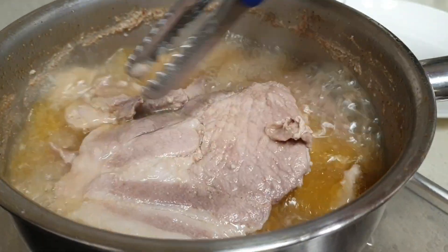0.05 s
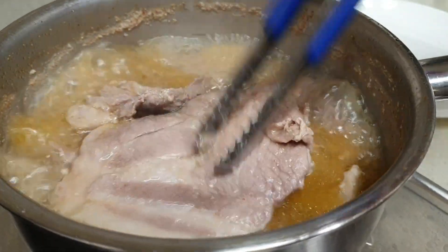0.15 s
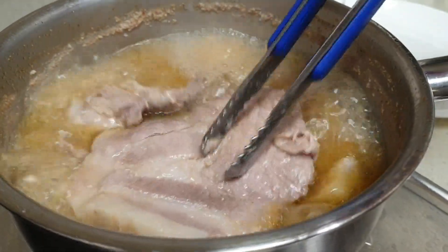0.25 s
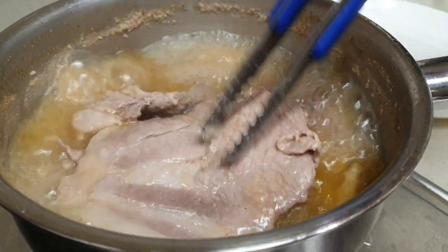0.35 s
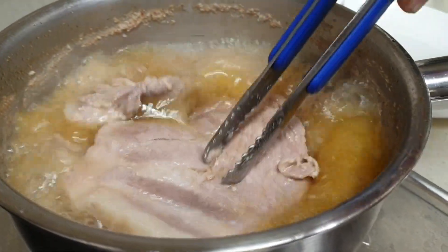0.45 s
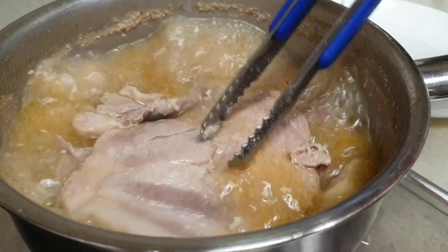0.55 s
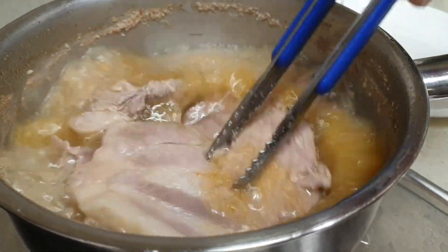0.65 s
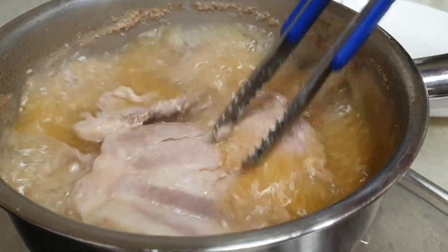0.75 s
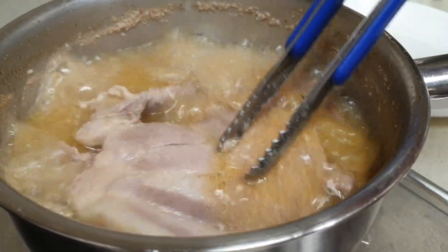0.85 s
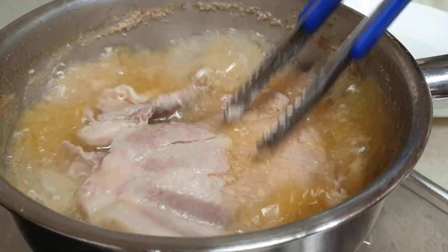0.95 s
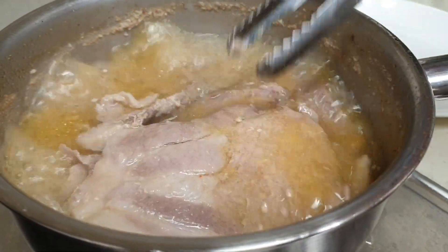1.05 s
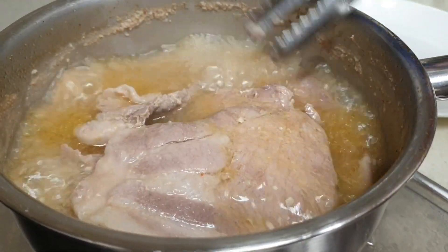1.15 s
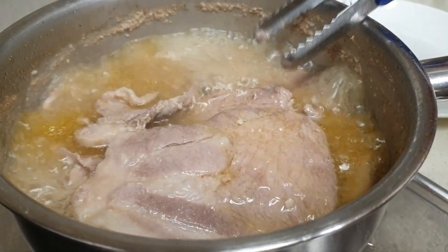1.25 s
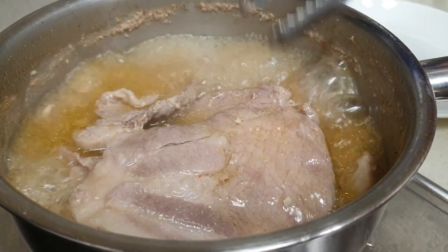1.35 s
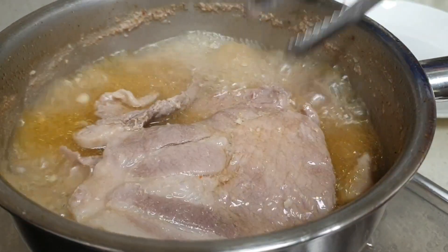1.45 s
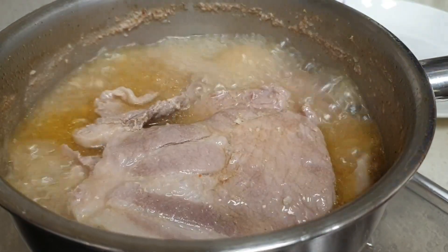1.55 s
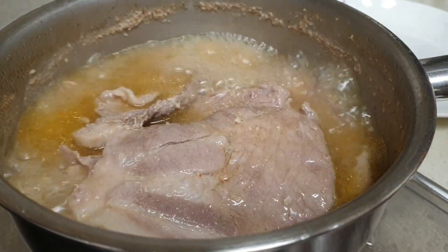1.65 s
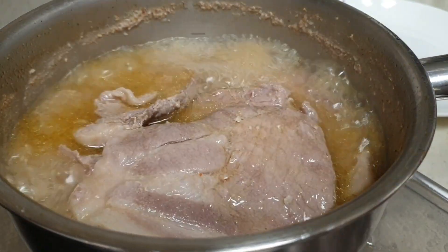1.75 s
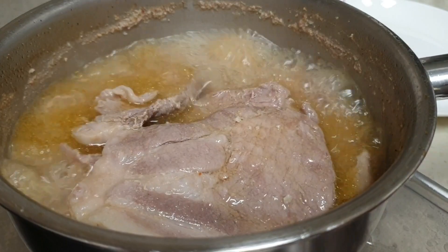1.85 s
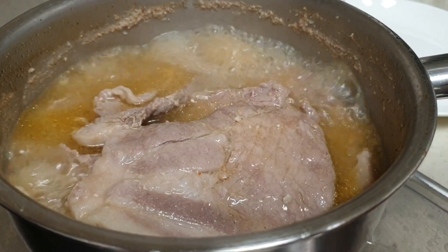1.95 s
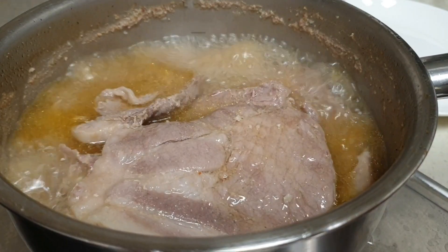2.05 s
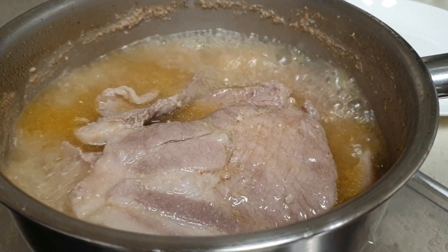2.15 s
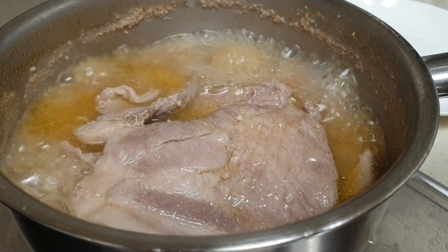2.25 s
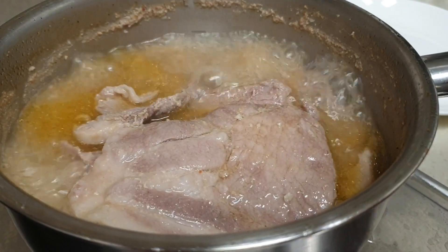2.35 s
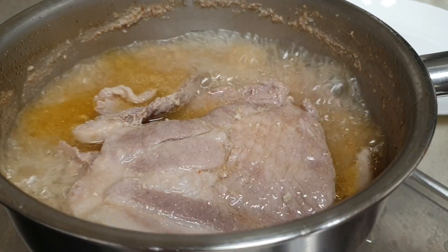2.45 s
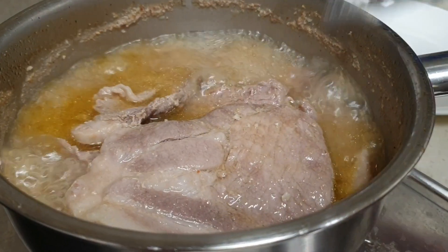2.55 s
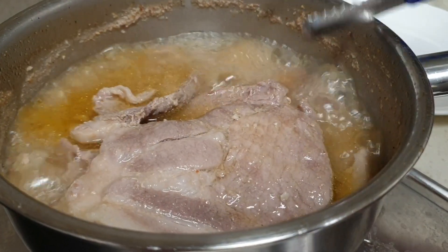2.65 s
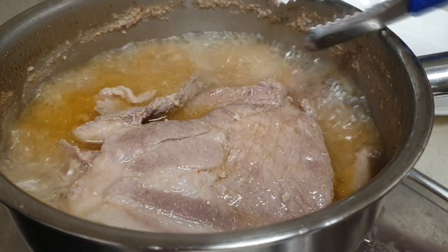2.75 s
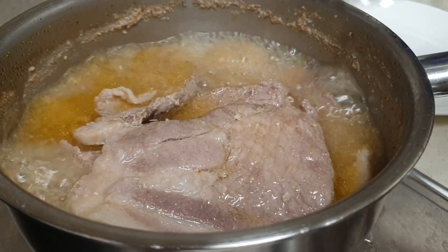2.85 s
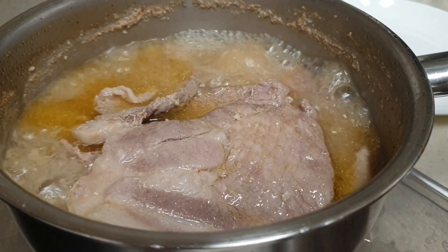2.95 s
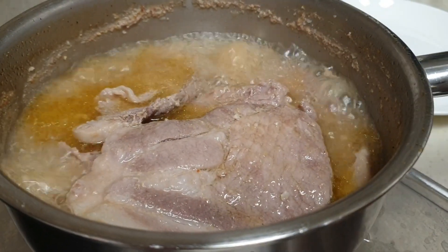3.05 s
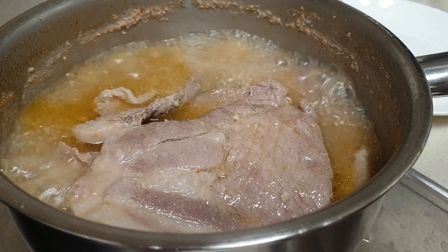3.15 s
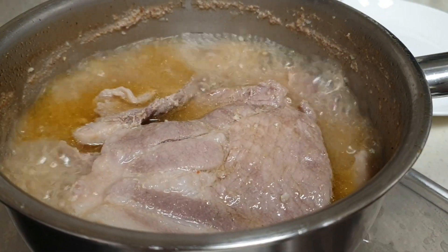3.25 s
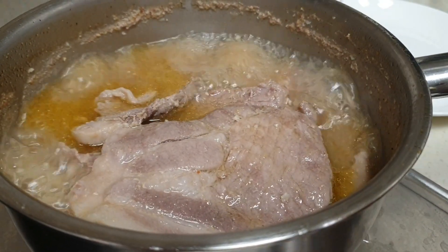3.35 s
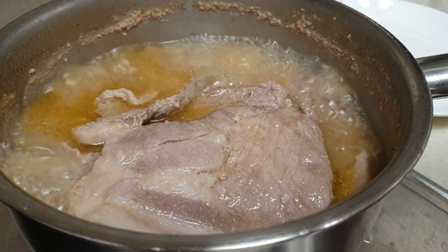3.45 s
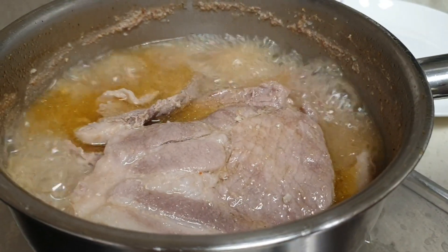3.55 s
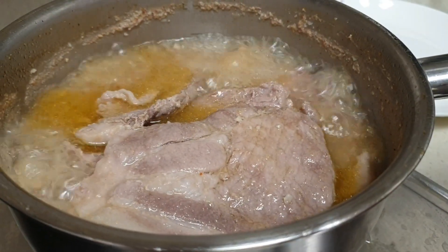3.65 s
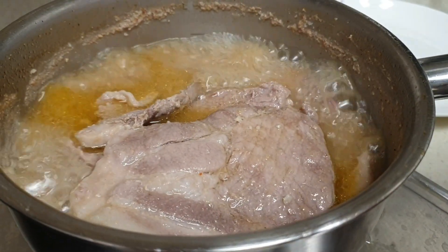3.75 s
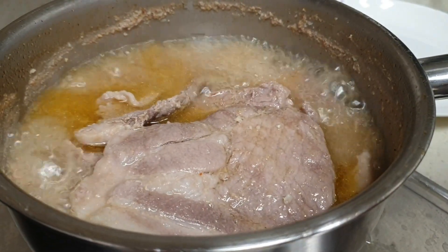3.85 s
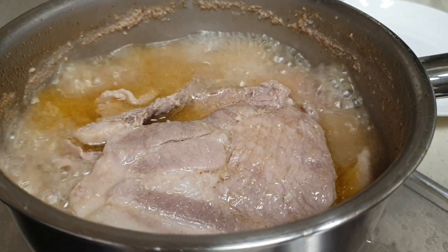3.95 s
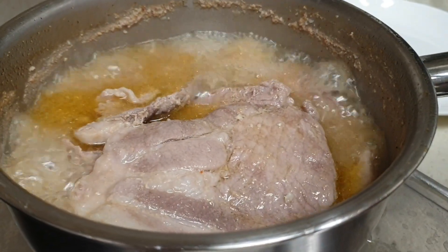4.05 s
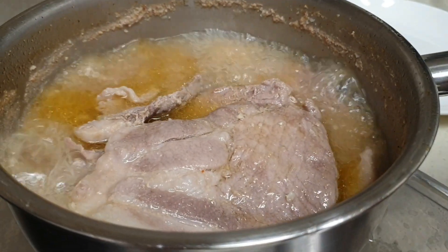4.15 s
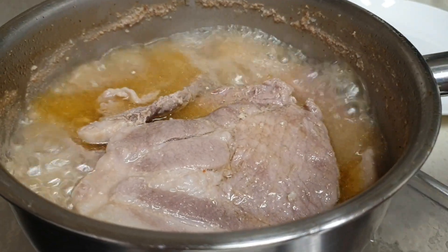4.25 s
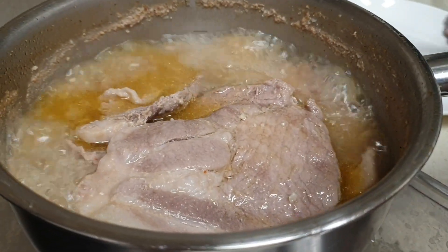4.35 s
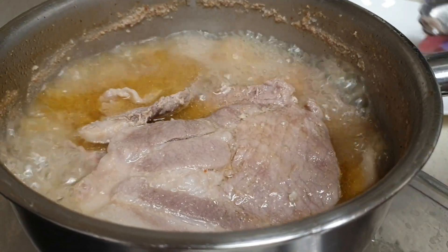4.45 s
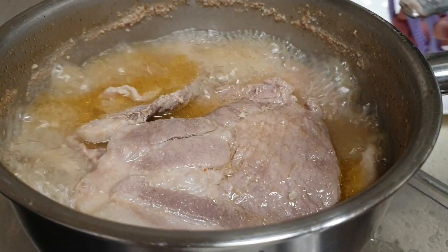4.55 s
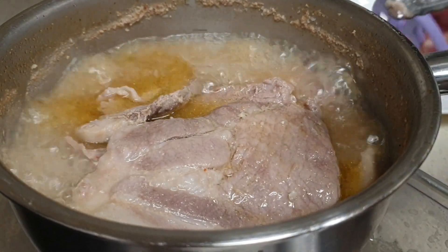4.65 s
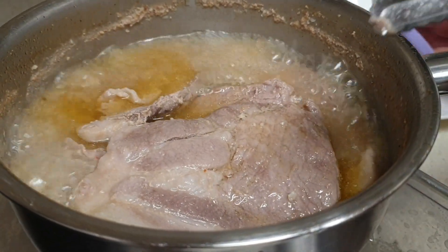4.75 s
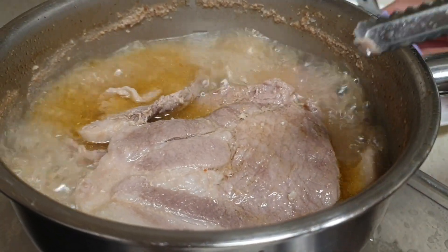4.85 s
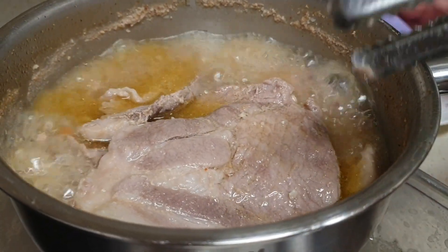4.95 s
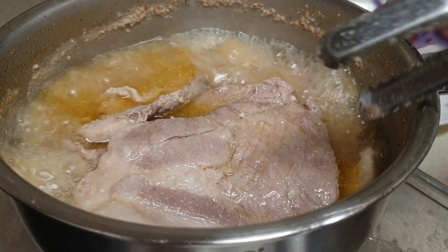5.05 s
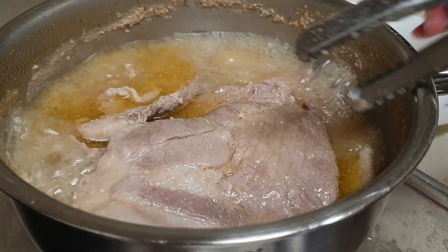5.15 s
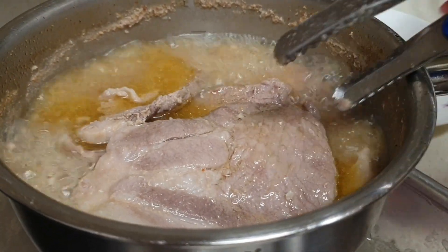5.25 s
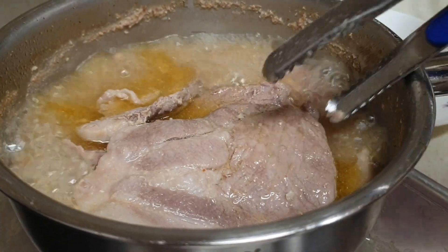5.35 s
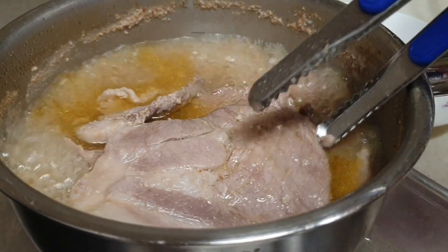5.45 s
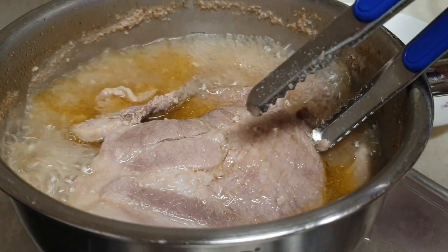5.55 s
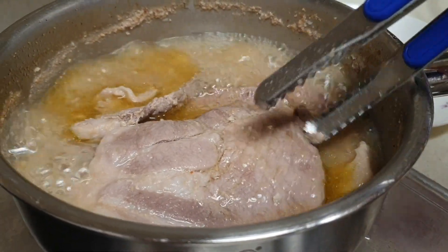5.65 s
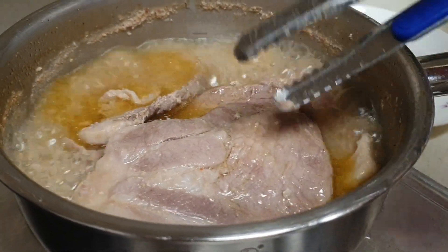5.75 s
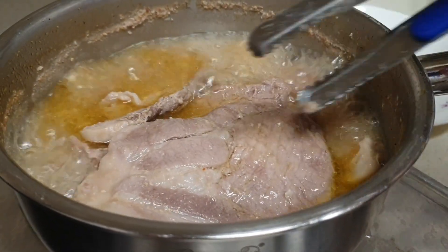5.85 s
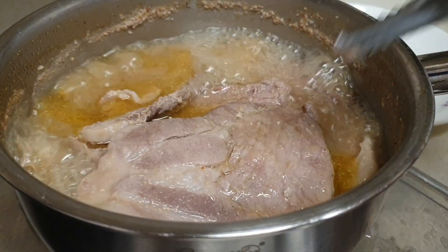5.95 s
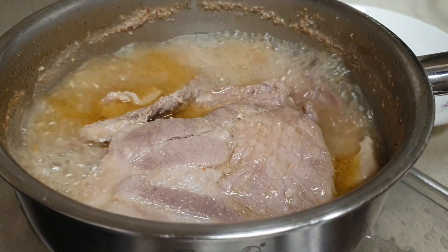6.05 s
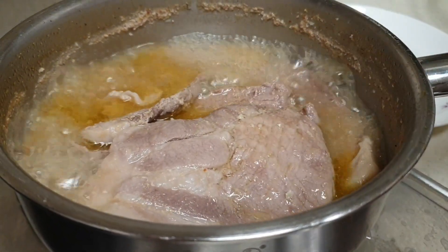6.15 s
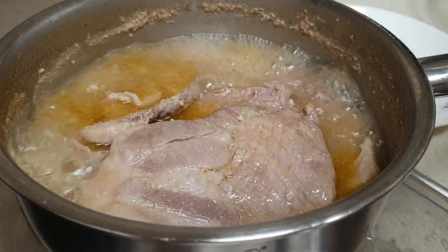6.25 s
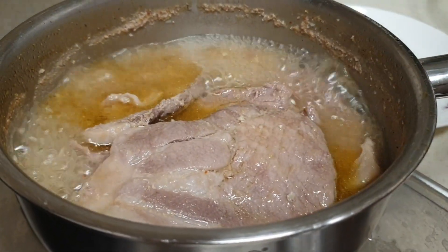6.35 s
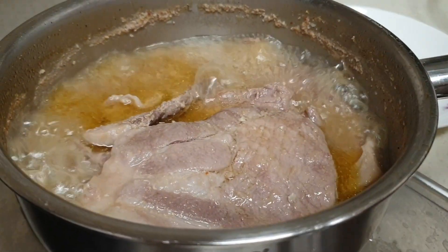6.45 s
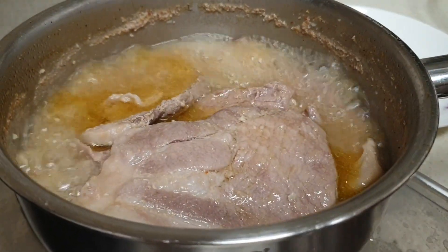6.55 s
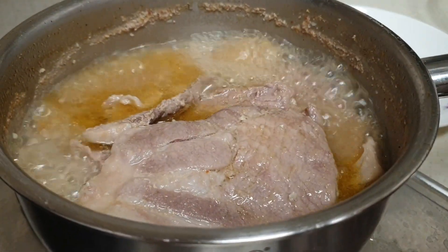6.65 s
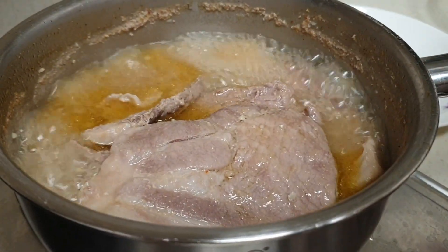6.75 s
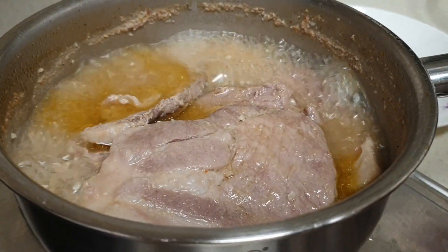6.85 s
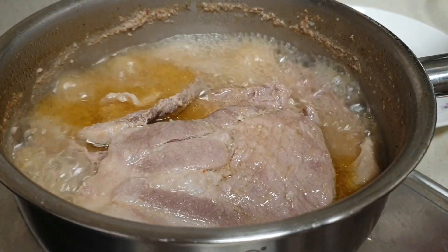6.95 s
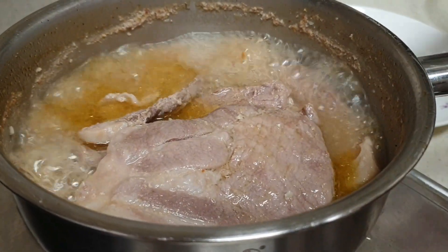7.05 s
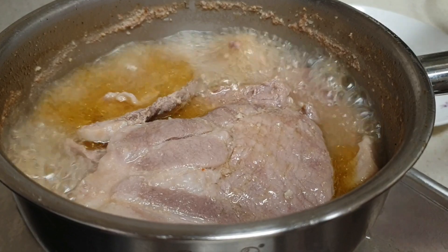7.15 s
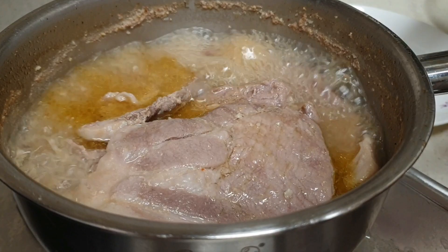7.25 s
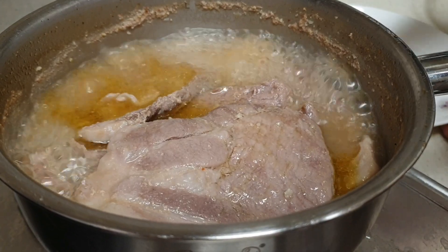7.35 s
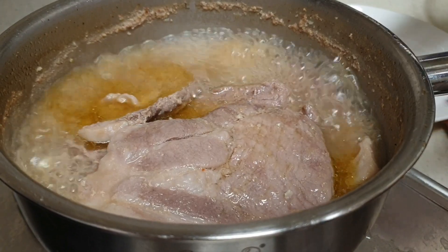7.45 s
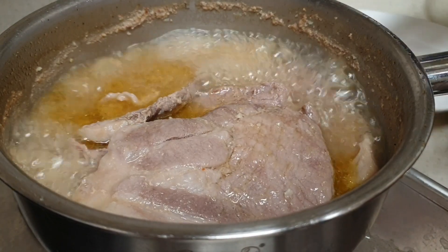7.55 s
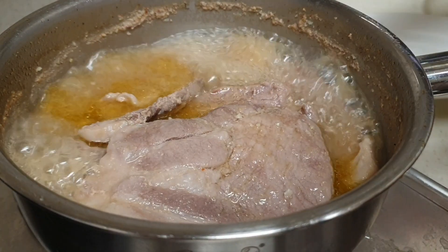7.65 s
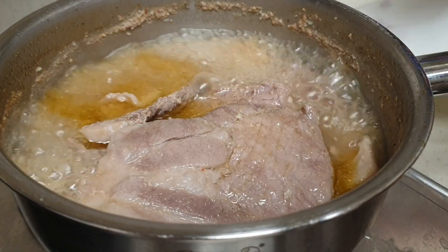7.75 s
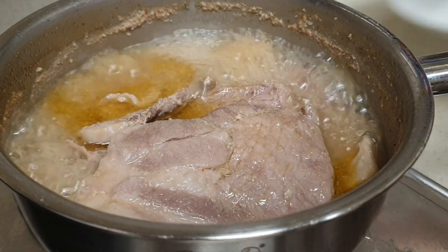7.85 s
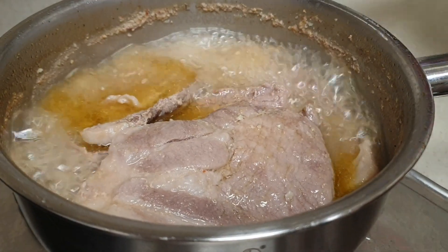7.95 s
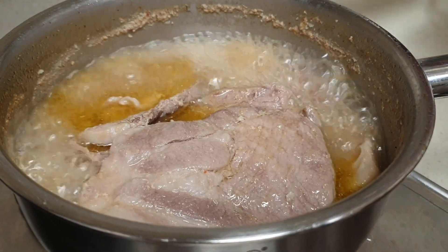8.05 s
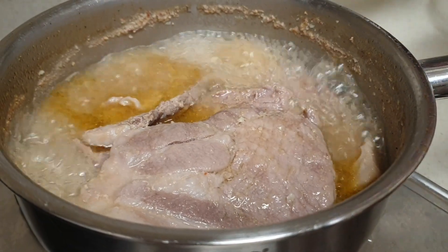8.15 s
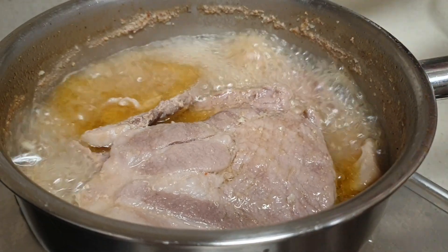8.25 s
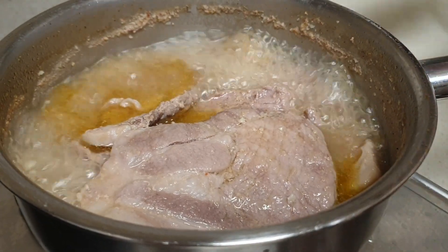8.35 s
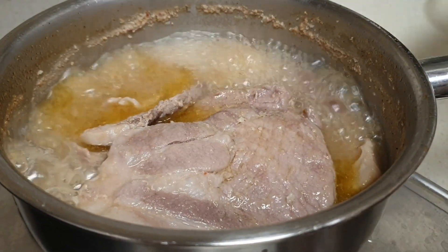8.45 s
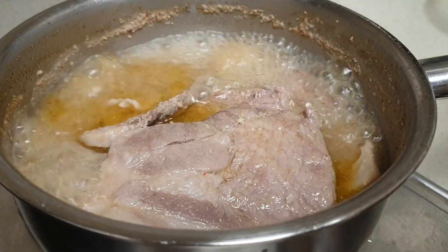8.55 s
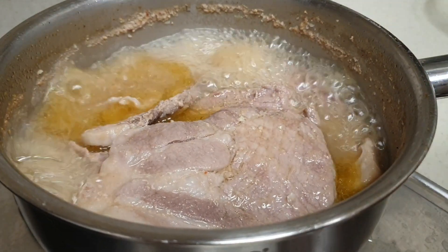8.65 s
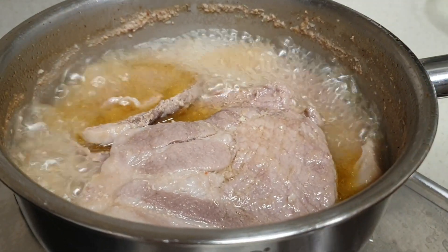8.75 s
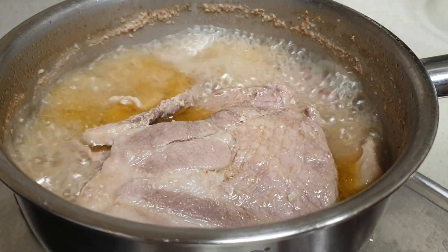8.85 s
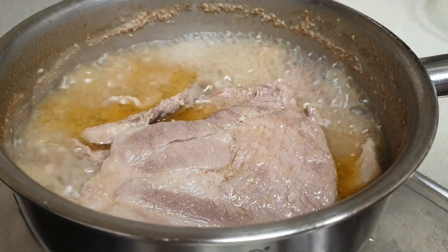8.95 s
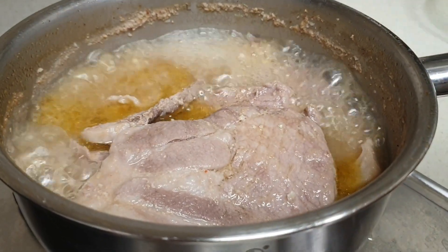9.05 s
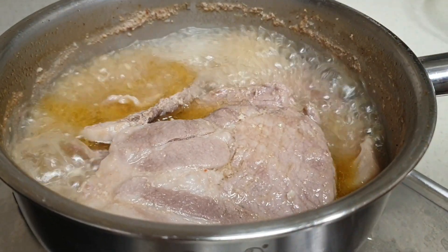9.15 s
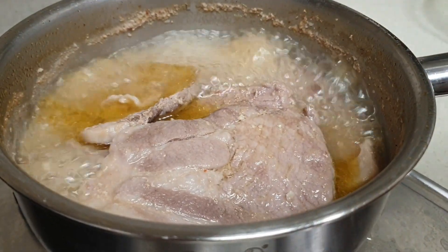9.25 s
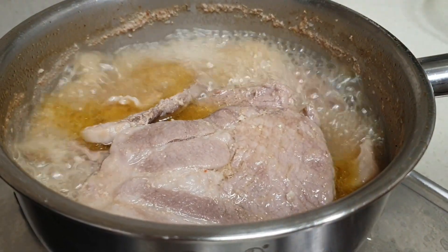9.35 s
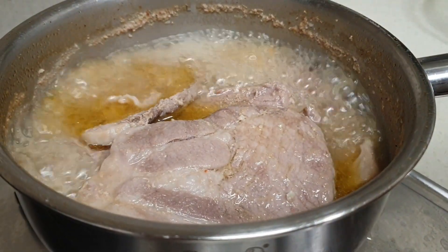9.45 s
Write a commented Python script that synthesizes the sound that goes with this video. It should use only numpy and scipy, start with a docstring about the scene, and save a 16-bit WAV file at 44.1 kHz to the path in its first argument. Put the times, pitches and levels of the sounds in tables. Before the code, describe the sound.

A gentle rolling boil crackles in a metal pan under a humming fan, broken by loud tong taps, a clatter and a ringing clink.

```python
"""A small hard kitchen: pork simmers in a steel pan to the left, over the hum of a fan.
Pitched bubbles pop amid a crackle of clicks, and tiny ticks and noise make the foam's fizz at the wall.
Steel tongs tap the rim, brush the pan, clatter beside the stove, slide and are dropped with a clink:
blows mix noise bursts, decaying modes and a thud; slides feed rough noise into the metal's modes.
The fan is shaped noise under two wavering tones; short diffuse tails are the room's answer."""
import sys
import numpy as np
from scipy import signal
from scipy.fft import rfft, irfft, next_fast_len
from scipy.io import wavfile
from scipy.ndimage import map_coordinates

SR = 44100
rng = np.random.default_rng(int(sys.argv[2]) if len(sys.argv) > 2 else 0)


def put_to_file(sound):
    """Save the sound as 16-bit audio at rate SR, in the file named by the first command-line argument."""
    columns = np.atleast_2d(sound).T  # one column per channel
    safe = np.clip(columns, -1, 1)
    whole_steps = np.round(safe * 32767)
    wavfile.write(sys.argv[1], SR, whole_steps.astype(np.int16))


N = 418929

# strength of the boil, driving fizz and bubbling; it swells when the tongs press the meat: t/s, level/dB
BOIL_STRENGTH = [(0.0, -54), (1.5, -55.5), (1.85, -56), (2.91, -55.5), (3.07, -56), (3.33, -59.5),
                 (3.86, -56), (4.65, -57.5), (5.24, -54.5), (5.4, -53), (6.19, -55), (6.43, -54.5),
                 (6.82, -56), (8.71, -54.5), (8.94, -58.5), (9.5, -57.5)]
# layers at the average boil, before each layer's trim: level/dB, growth/(dB per dB of boil)
FIZZ_DRIVE = (-53, 0.86)
BUBBLING_DRIVE = (-54.5, 0.95)
# the biggest bubbles bursting: t/s, level before trim/dB, starting pitch f/Hz
BIG_POPS = [(0.085, -35, 940), (0.299, -35, 920), (0.56, -30, 1060), (0.622, -30.5, 990),
            (0.763, -25, 1070), (0.776, -27, 1290), (0.8, -20, 1210), (0.978, -27.5, 1110),
            (1.023, -24, 1840), (1.256, -25.5, 1150), (1.702, -32.5, 1750), (2.019, -31.5, 1350),
            (2.374, -33, 990), (2.429, -31.5, 1250), (3.098, -37.5, 970), (3.554, -35.5, 970),
            (3.674, -33, 960), (3.824, -34, 999), (4.36, -33.5, 1070), (5.339, -34, 1300),
            (6.109, -32, 1040), (6.13, -25.5, 950), (6.602, -25.5, 960), (6.853, -31.5, 920),
            (6.98, -27.5, 940), (7.028, -33.5, 675), (8.09, -29, 920), (8.312, -27.5, 920),
            (9.424, -32, 1965)]
# spectral shape of the bubbling broth: f/Hz, relative level/dB per Hz
BROTH_SPECTRUM = [(180, -49), (300, -3), (380, -12.5), (480, 6), (730, 5.5), (820, -22), (950, 9.5),
                  (1300, -11.5), (1750, 1.5), (2150, -12.5), (2500, -5), (4500, -29), (6000, -50)]
# spectral shape of the fizzing foam: f/Hz, relative level/dB per Hz
FOAM_SPECTRUM = [(2060, -13.5), (3500, -7), (3960, -10.5), (7530, -13), (8470, -10.5), (10300, -0.5),
                 (12100, -3.5), (13900, -4), (14900, -13), (15500, -57)]
# low rumble of the fan and the rolling boil: t/s, level before trim/dB
RUMBLE_LEVEL = [(0.0, -46.5), (0.47, -45), (1.77, -49.5), (4.21, -50.5), (4.6, -51.5), (5.5, -46.5),
                (6.54, -47.5), (6.64, -49), (8.65, -49), (9.5, -55.5)]
# spectral shape of the fan's air: f/Hz, relative level/dB per Hz
FAN_SPECTRUM = [(13, -69), (22, -52), (32, -22), (40, -29), (55, -10), (76, -4.5), (103, -16.5),
                (136, -3.5), (162, -14), (184, -3), (203, -4), (216, -24.5), (242, -13), (300, -23.5),
                (450, -24), (580, -38), (990, -120)]
# stereo lean of the steady sounds: f/Hz, left minus right level/dB
STEADY_LEAN = [(60, 5), (240, 5), (480, 10.5), (1000, 10), (2000, 13), (3500, 19.5), (5000, 7), (7500, 18),
               (10500, 3.5), (14000, 4)]
# left-right likeness of the steady noise: f/Hz, likeness/0-1
LIKENESS = [(60, 0.95), (130, 0.79), (300, 0.48), (900, 0.73), (1900, 0), (15000, 0)]
# decay of the kitchen's answer: f/Hz, t60/s
KITCHEN_DECAY = [(150, 0.5), (1000, 0.18), (4000, 0.27), (14000, 0.17)]
# tongs rubbing meat, pan or counter: t/s, length/s, pan ring level/dB, tongs ring level/dB, dry rasp level/dB
RUBS = [(.34, 0.039, -73, -80, -67), (0.55, 0.049, -78, -89, -62), (1.002, 0.054, -67, -80, -56.5),
        (3.69, 0.043, -62, -80, -58), (4.776, 0.23, -65, -65, -62), (5.23, 0.15, -67, -80, -61),
        (5.489, 0.11, -57.5, -67, -57.5), (7.601, 0.19, -67, -51.5, -60)]
# spectral shape of the dry rasp: f/Hz, relative level/dB per Hz
RASP_SPECTRUM = [(1200, -26), (2500, 5), (3800, -7), (4800, -7), (6200, -5), (9000, -22), (15000, -25)]
# resonances of the pan: f/Hz, relative level/dB, t60/s
PAN_MODES = [(434, -16, 0.46), (597.4, 2, 0.16), (758, -7.5, 0.15), (1264, -11.5, 0.24), (1790, -6, 0.19),
             (2260, -11, 0.25), (2433, -4.5, 0.25), (2830, -5, 0.082), (2994, -10.5, 0.3),
             (3445, -6.5, 0.16), (3940, -3.5, 0.067), (3750, -12, 0.29), (4660, -14, .14), (4835, -16, .13),
             (5850, -11.5, 0.14), (7120, -4, 0.036), (8130, -11, 0.11), (8300, -31, 0.08), (8050, -41, .14),
             (8880, 1, 0.091), (9730, 4, 0.031), (9250, -19, 0.032), (11100, -7.5, 0.057),
             (11100, 9, 0.033), (12100, -43, 0.045)]
# resonances of the tongs: f/Hz, relative level/dB, t60/s
TONGS_MODES = [(1515, -11, 0.35), (2450, -9, 0.24), (2620, -7, 0.19), (2940, -12, 0.24), (3190, -9, 0.29),
               (4110, 4, 0.13), (4220, -20, 0.21), (5670, 2, 0.17), (5850, 2, 0.087), (6340, -31, 0.72),
               (7150, -13, 0.25), (7240, -6, 0.087), (8560, -17, 0.18), (9000, -15.5, 0.28),
               (9752, -7.5, 0.23), (10970, 3.5, 0.12), (11900, 1, .12), (12200, -8, 0.15)]
# how strongly rubbing feeds each metal's modes: f/Hz, gain/dB
PAN_RUB_FEED = [(600, -12), (2400, -10), (4800, 11), (7000, -6), (12000, 5)]
TONGS_RUB_FEED = [(1500, 9.5), (2600, -3), (3200, -22), (4150, 6.5), (5800, -9), (6300, 9), (7200, -8),
                  (12000, 2)]
# tongs striking the pan: t/s, level/dB, relative thud level/dB,
# colour at 2.4 kHz, 4.3 kHz and 10 kHz against 1 kHz/dB, left minus right before microphone colour/dB
PAN_TAPS = [(1.303, -8.5, -13.5, -2, 7.5, 1, 5), (2.6925, -9.5, -6.5, 2, -0.5, 5.5, 6.5),
            (2.8775, -11.5, 1.5, 5.5, 2.5, 6.5, 5.5), (3.69, -27.5, 12, -7, -3, -21, 5),
            (3.862, -26, 0, -6, 1, -8, 5), (3.94, -30.5, -8, -11, 0.5, -15, 4.5),
            (5.014, -23, 13, -2, 5, -10, 4.5), (5.212, -37.5, -8, 4, 8.5, 0, 5),
            (6.1325, -36, 3, 0, 5, 3, 7)]
# spectral shape of the rim's dense short ringing: f/Hz, relative level/dB per Hz
RIM_SPECTRUM = [(120, -47), (200, -3), (435, -16), (600, 0.5), (900, 2.5), (1450, -10), (2060, -12),
                (2600, -7), (3800, -11), (4400, -17), (4800, -9.5), (5500, -20.5), (8800, -8.5),
                (15000, -13)]
# spectral shape of a blow's thud: f/Hz, relative level/dB per Hz
THUD_SPECTRUM = [(50, -33), (100, 8), (140, 12), (220, -9.5), (500, -4.5), (2000, -91)]
# the two microphones' different colour on steel: f/Hz, left minus right level/dB
MICROPHONE_COLOUR = [(150, 1), (400, 3), (1200, 1), (2500, 3), (5000, 0), (8000, 7), (10500, -2),
                     (14000, -2.5)]
# utensils clattering on the counter: columns as for the pan taps
# (t/s, level/dB, thud/dB, colour at 2.4, 4.3 and 10 kHz/dB, left minus right/dB)
COUNTER_HITS = [(6.328, -10, -8, -8, -4, -3, 5.5), (6.334, -7, -7, -0.5, -1.5, 0.5, 6.5),
                (6.342, -16.5, -1, 10, 5.5, 6, 3), (6.37, -25, 15, 0, 4, 15, 2),
                (6.43, -20.5, 11.5, 4, 0.5, -4, 6), (6.48, -15, -15, 4, 4.5, 10.5, 0.5),
                (6.491, -12.5, -1, 8.5, 5, -13, 3), (6.527, -14.5, 7.5, 0, -4, -2.5, 6.5),
                (9.1435, -28.5, 6, 1.5, 3.5, 13, 5), (9.235, -30, 5.5, -8, -6, -4, 1)]
# spectral shape of the counter's dense short ringing: f/Hz, relative level/dB per Hz
COUNTER_SPECTRUM = [(120, -53), (200, -2), (370, -7.5), (521, -1.5), (864, -5), (1240, -4), (1460, -11),
                    (3350, -11), (5070, -11.5), (7830, -20), (10500, -12.5), (13700, -14), (15000, -36)]
# short resonances of the utensils: f/Hz, relative level/dB, t60/s
UTENSIL_MODES = [(795, -2, 0.15), (1077, -16, 0.41), (2434, -11.5, 0.25), (3030, -3.5, 0.14),
                 (3350, 1, 0.077), (3640, -3, 0.1), (4320, -1, 0.1), (6980, -16, .18), (7290, -29, .16),
                 (10120, 3, 0.061), (10900, -1, 0.092)]
# tongs dropped: columns as for the pan taps
# (t/s, level/dB, thud/dB, colour at 2.4, 4.3 and 10 kHz/dB, left minus right/dB)
TONGS_DROPS = [(8.709, -6, -3.5, 1.5, -0.5, 2.5, 3.5)]
# spectral shape of the drop's dense short ringing: f/Hz, relative level/dB per Hz
DROP_SPECTRUM = [(120, -24), (200, 5), (330, -26), (600, 0), (1040, -7), (1600, -12), (2550, -3),
                 (3410, -12), (4100, -1), (4810, -9), (5860, 0), (8100, -29), (12000, -10), (14000, -27),
                 (15000, -45)]

POP_CYCLES = 0.38  # cycles that a big bubble's envelope takes to reach its peak
SMALL_LOW_HZ, SMALL_PITCH_RATIO = 756, 2.27  # lowest pitch of the small bubbles; highest over lowest
SMALL_DB, SMALL_RANGE_DB = 4.5, 16.5  # weakest small bubble over the bubbling; strongest over weakest
# neighbours of a big bubble: within this time of it, at this level, up to this much higher
CLUSTER_S, CLUSTER_DB, CLUSTER_OCTAVES = 0.035, -9, 0.69
TOP_HZ = 14750  # upper band limit


def amp(db):
    """Decibels to gain."""
    return 10 ** (np.asarray(db) / 20)


def unit(x):
    """Scale to rms 1."""
    return x / np.sqrt(np.mean(x ** 2) + 1e-20)


def along(points, hz):
    """Read (f/Hz, value) points on a log frequency axis."""
    f, value = np.transpose(points)
    return np.interp(np.log(hz + 1), np.log(f + 1), value)


def curves(rows):
    """Draw one value per sample for each column after the time."""
    s, *columns = np.transpose(rows)
    t = np.arange(N) / SR
    return [np.interp(t, s, column) for column in columns]


def wobble(rate):
    """A smooth random curve with rate knots a second."""
    knots = rng.standard_normal(int(N * rate / SR) + 4)
    return map_coordinates(knots, [np.arange(N) * rate / SR])


def filtered(x, response):
    """Shape x by a gain that depends on frequency."""
    n = x.shape[-1]
    m = next_fast_len(n + SR // 8)
    hz = np.fft.rfftfreq(m, 1 / SR)
    return irfft(rfft(x, m) * response(hz), m)[..., :n]


def coloured(x, spectrum):
    """Shape x by a spectrum and bring it to rms 1."""
    return unit(filtered(x, lambda hz: amp(along(spectrum, hz))))


def sides(lean_db):
    """Left and right gains for a level difference."""
    return amp(np.array([[0.5], [-0.5]]) * lean_db)


def add(track, s, sound):
    """Mix a sound into a track at a time in seconds."""
    start = max(round(s * SR), 0)
    part = track[..., start:][..., :sound.shape[-1]]
    part += sound[..., :part.shape[-1]]


def rush(spectrum):
    """Stereo noise of rms 1, alike in the bass and unrelated in the treble."""
    def mid_side_gains(hz):
        turn = np.arccos(np.clip(along(LIKENESS, hz), -1, 1)) / 2
        return np.array([np.cos(turn), np.sin(turn)])

    mid, side = filtered(rng.standard_normal((2, N)), mid_side_gains)
    return coloured(np.array([mid + side, mid - side]), spectrum)


def kitchen(x):
    """Diffuse answer of the room: a decaying noise tail for each microphone, 5 ms behind the source."""
    hz, t, grains = signal.stft(rng.standard_normal((2, SR // 3)), SR, nperseg=256)
    decay = amp(-60 * t / along(KITCHEN_DECAY, hz)[:, None])
    tail = signal.istft(grains * decay, SR, nperseg=256)[1]
    tail = np.pad(tail / np.linalg.norm(tail[0]), ((0, 0), (SR // 200, 0)))
    return signal.fftconvolve(x, tail, axes=1)[:, :x.shape[-1]]


def driven(level_db, growth):
    """Level in dB of a layer that rises and falls with the boil."""
    boil_db, = curves(BOIL_STRENGTH)
    return level_db + growth * (boil_db - boil_db.mean())


def bubble(hz, cycles, rise, echo_db, echo_t60):
    """A bursting film: the opening cavity sounds briefly, rising in pitch, then echoes from the pan's wall."""
    t = np.arange(SR // 25) / SR
    age = t * hz / cycles
    swing = 2 * np.pi * hz * t * (1 + rise * (1 - np.exp(-age / 2)))
    pop = age * np.exp(1 - age) * np.sin(swing + rng.uniform(0, 2 * np.pi))
    echoes = rng.standard_normal((2, len(t))) * amp(-60 * t / echo_t60) * (t > 0.002)
    echoes /= np.linalg.norm(echoes[0])
    return pop + amp(echo_db) * signal.fftconvolve(pop[None], echoes, axes=1)[:, :len(t)]


def big_bubbles(count=3):
    """Each big bubble bursts amid a few weaker, higher neighbours."""
    out = np.zeros((2, N))
    for s, db, hz in BIG_POPS:
        burst = bubble(hz, cycles=POP_CYCLES, rise=0.014, echo_db=-0.5, echo_t60=0.07)
        add(out, s, amp(db + 0.7) * burst)
        for when, pitch in rng.random((count, 2)):
            neighbour_hz = hz * 2 ** (CLUSTER_OCTAVES * pitch)
            neighbour = bubble(neighbour_hz, cycles=POP_CYCLES, rise=0.05, echo_db=-3.5, echo_t60=0.055)
            add(out, s + CLUSTER_S * (2 * when - 1), amp(db + CLUSTER_DB) * neighbour)
    return out


def small_bubbles(bubbling_db, count=600):
    """Small cavities burst at random, most of them weak, a few standing out."""
    out = np.zeros((2, N))
    for when, size, pitch, life in rng.random((count, 4)):
        db = bubbling_db[int(when * N)] + SMALL_DB + SMALL_RANGE_DB * size ** 2.2
        hz = SMALL_LOW_HZ * SMALL_PITCH_RATIO ** pitch
        cycles = 0.41 + 0.34 * life ** 2
        burst = bubble(hz, cycles=cycles, rise=0.064, echo_db=-2.0, echo_t60=0.052)
        add(out, when * N / SR, amp(db) * burst)
    return out


def foam(life, spread_db, cap_db, clump_db, count=14000):
    """Tiny cells burst in clumps, each a short pitched tick heard differently at the two microphones."""
    when, pitch, size, place, phase = rng.random((5, count, 1))
    start, k = (when * N).astype(int), np.arange(128)
    age = k / SR / life  # life in s
    db = np.minimum(-spread_db * np.log(1 - size), cap_db) + clump_db * wobble(22)[start]
    hz = 3000 + 12000 * pitch ** 0.7
    swing = 2 * np.pi * hz * k / SR
    ticks = amp(db) * age * np.exp(-age)
    left = ticks * np.sqrt(place) * np.sin(swing)
    right = ticks * np.sqrt(1 - place) * np.sin(swing + 2 * np.pi * phase)
    spots = (start + k).ravel()
    return np.array([np.bincount(spots, side.ravel(), N)[:N] for side in (left, right)])


def simmer():
    """Single pops stand on a dense crackle of tiny bubbles; foam fizzes above them."""
    bubbling_db, fizz_db = driven(*BUBBLING_DRIVE), driven(*FIZZ_DRIVE)
    surge_db = bubbling_db + 0.9 * wobble(12)  # the boil comes in surges
    pops = big_bubbles() + small_bubbles(surge_db)
    pops = filtered(pops, lambda hz: 1 / np.sqrt(1 + (hz / 2200) ** 8))
    # the smallest bubbles are clicks, about 450 a second, coloured by the pan's hollow
    clicks = (rng.random(N) < 450 / SR) * rng.standard_normal(N)
    crackle = coloured(clicks + amp(2.0) * kitchen(clicks[None]), BROTH_SPECTRUM)
    murmur = amp(surge_db - 2.5) * crackle + amp(surge_db - 6) * rush(BROTH_SPECTRUM)
    cells = coloured(foam(life=0.00024, spread_db=4, cap_db=16, clump_db=0.8), FOAM_SPECTRUM)
    fizz = amp(fizz_db - 3.0) * cells + amp(fizz_db - 1.5) * rush(FOAM_SPECTRUM)
    return murmur + fizz + pops + amp(-9.0) * kitchen(pops)


def fan(blade_hz=190.9, blade_db=-51, air_db=4, drone_hz=70, drone_db=-57):
    """Air rumbles in a duct under a blade tone and a low drone, both wavering in pitch and level."""
    def tone(hz, db):
        phase = 2 * np.pi * np.cumsum(hz + 2.3 * wobble(14)) / SR
        return amp(db + 2.5 * wobble(12)) * np.sin(phase)

    rumble_db, = curves(RUMBLE_LEVEL)
    air = amp(rumble_db + air_db) * rush(FAN_SPECTRUM)
    return air + tone(blade_hz, blade_db) + tone(drone_hz, drone_db)


def ring(modes, t, scatter_db, blur_hz):
    """Modes struck at new strengths; chatter of the contact makes their phases wander."""
    out = np.zeros((2, len(t)))
    for hz, db, t60 in modes:
        steps = rng.standard_normal((2, len(t)))
        wander = np.cumsum(steps, axis=1) * np.sqrt(2 * np.pi * blur_hz / SR)
        phase = rng.uniform(0, 2 * np.pi) + np.array([[0], [rng.normal(0, 0.66)]]) + wander
        strength_db = db + scatter_db * rng.standard_normal((2, 1))
        out += amp(strength_db - 60 * t / t60) * np.sin(2 * np.pi * hz * t + phase)
    return out * (1 - np.exp(-t / 0.0017))


def slides():
    """Sliding steel catches many times a second: a dry rasp that keeps the touched metal sounding."""
    out, t = np.zeros((2, N)), np.arange(int(SR / 12)) / SR
    for s, length, pan_db, tongs_db, rasp_db in RUBS:
        stroke = signal.windows.tukey(int(length * SR), 0.5)
        catches = stroke * rng.standard_normal((2, len(stroke)))
        catches = np.pad(catches, ((0, 0), (0, len(t))))
        add(out, s, amp(rasp_db) * coloured(catches, RASP_SPECTRUM))
        metals = (PAN_MODES, pan_db, PAN_RUB_FEED), (TONGS_MODES, tongs_db, TONGS_RUB_FEED)
        for modes, db, feed in metals:
            # rubbing feeds the modes more evenly than a blow does
            fed = [(hz, level * 0.45 + along(feed, hz), t60) for hz, level, t60 in modes]
            rubbed = ring(fed, t, scatter_db=5, blur_hz=27)
            add(out, s, amp(db) * unit(signal.fftconvolve(catches, rubbed, axes=1)))
    return out


def blows(rows, body, modes, t60, body_db, crack_db, knock_db, room_db, modes_db=0, blur_hz=0):
    """Each contact: a sharp crack, dense short ringing, lasting modes and a thud; the spot sets its colour."""
    out, t = np.zeros((2, N)), np.arange(int(SR / 3)) / SR
    for s, db, thud_db, mid_db, high_db, treble_db, lean_db in rows:
        dense = amp(body_db - 60 * t / t60) * coloured(rng.standard_normal((2, len(t))), body)
        crack = amp(crack_db - 60 * t / 0.0034) * rng.standard_normal((2, len(t)))
        thud_swell = amp(knock_db + thud_db - 60 * t / 0.22) * (1 - np.exp(-t / 0.015))
        thud = thud_swell * coloured(rng.standard_normal(len(t)), THUD_SPECTRUM)
        hit = dense + crack + amp(modes_db) * ring(modes, t, scatter_db=1.2, blur_hz=blur_hz)
        spot = [(1000, 0), (2400, mid_db), (4300, high_db), (10000, treble_db)]  # f/Hz, gain/dB
        hit = filtered(hit, lambda hz: amp(along(spot, hz)))
        add(out, s, amp(db) * sides(lean_db) * (hit + thud + amp(room_db) * kitchen(hit)))
    return out


def taps():
    """Tongs strike the rim and set the pan's modes ringing."""
    return blows(PAN_TAPS, RIM_SPECTRUM, PAN_MODES, t60=0.14, body_db=-9.5, crack_db=-7,
                 knock_db=-17.0, room_db=-11.5, modes_db=-14.5, blur_hz=20.4)


def ping(s=3.535, hz=3870, db=-59):
    """A faint, softly started ring of steel: one decaying sine."""
    out, t = np.zeros(N), np.arange(SR // 2) / SR
    swell = amp(-60 * t / 0.35) * (1 - np.exp(-t / 0.015))
    add(out, s, amp(db) * swell * np.sin(2 * np.pi * hz * t))
    return out


def clatter():
    """Utensils knock on the counter and ring with short modes."""
    return blows(COUNTER_HITS, COUNTER_SPECTRUM, UTENSIL_MODES, t60=0.14, body_db=-11, crack_db=-14,
                 knock_db=-18.0, room_db=-8.5, modes_db=-19.5, blur_hz=21.8)


def clink():
    """Dropped tongs land and ring in their own modes."""
    return blows(TONGS_DROPS, DROP_SPECTRUM, TONGS_MODES, t60=0.17, body_db=-13.5, crack_db=-15,
                 knock_db=-17.5, room_db=-11, modes_db=-12, blur_hz=16)


def scene():
    """Simmer and fan lean left by frequency; each steel sound leans left by its own amount."""
    def steady_gains(hz):
        gains = sides(along(STEADY_LEAN, hz))
        return gains / gains.mean(0)

    steady = filtered(simmer() + fan(), steady_gains)
    steel = (slides() + ping()) * sides(4.3) + taps() + clatter() + clink()
    return steady + filtered(steel, lambda hz: sides(along(MICROPHONE_COLOUR, hz)))


def record(dry):
    """Soft saturation rounds off the highest peaks, then a very steep low-pass closes the top."""
    rounded = dry / (1 + np.abs(dry / 0.85) ** 6) ** (1 / 6)
    return filtered(rounded, lambda hz: 1 / np.sqrt(1 + (hz / TOP_HZ) ** 160))


dry = scene()
out = record(dry)
put_to_file(out)
```